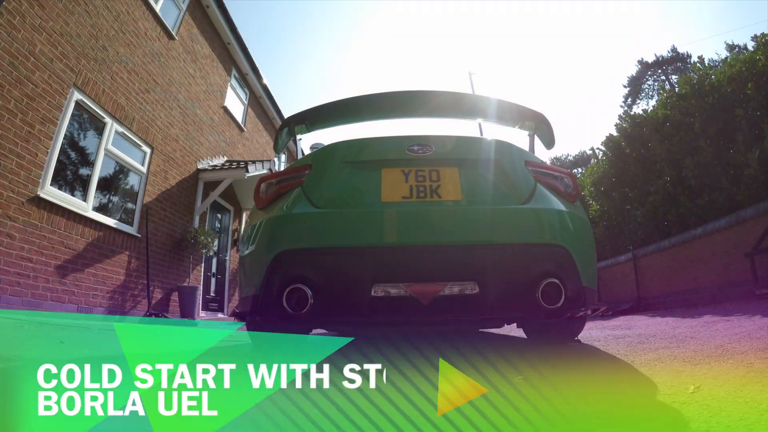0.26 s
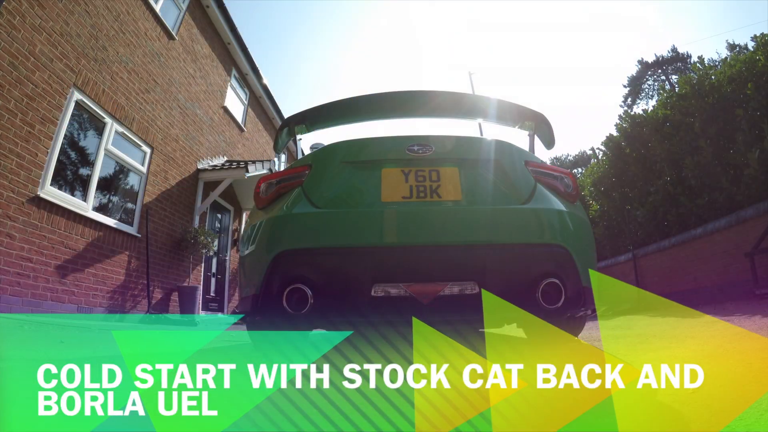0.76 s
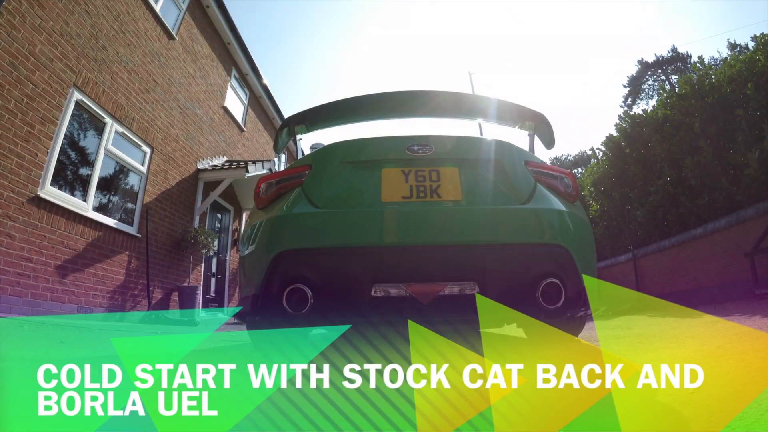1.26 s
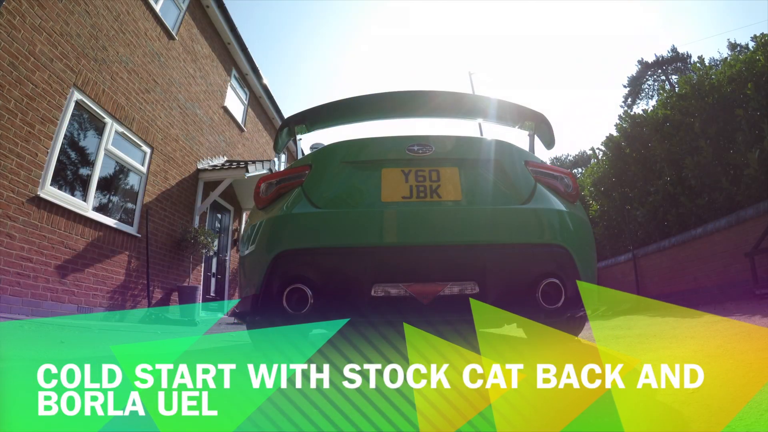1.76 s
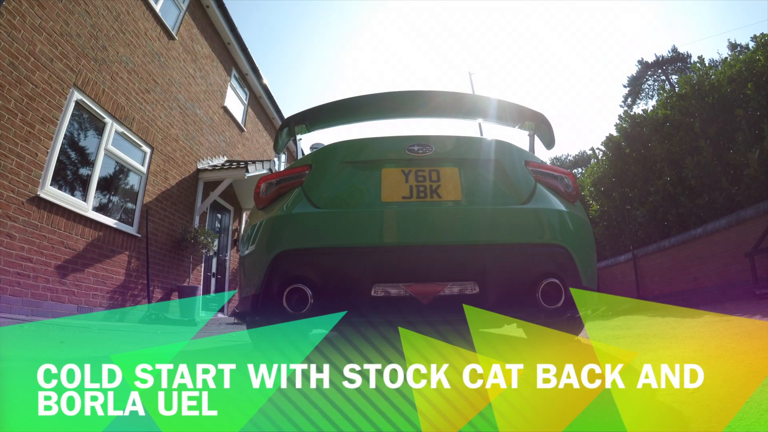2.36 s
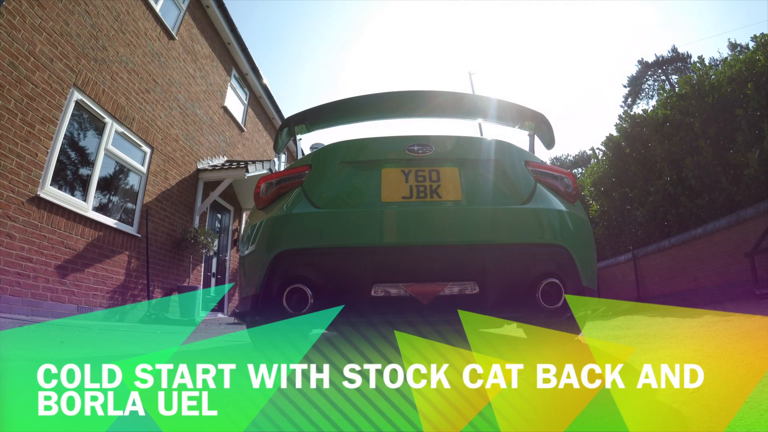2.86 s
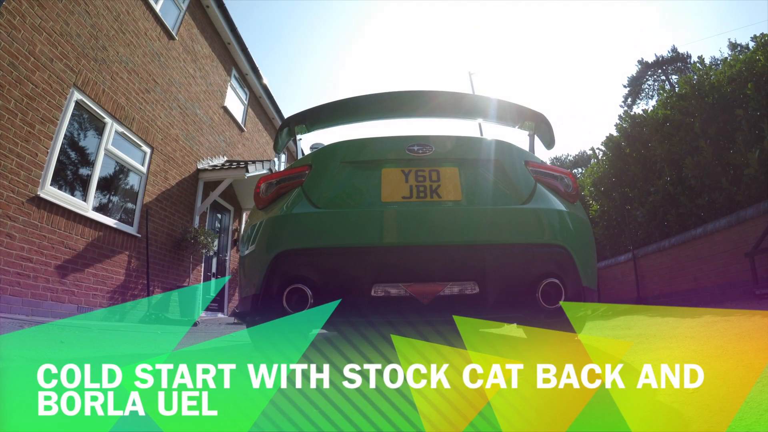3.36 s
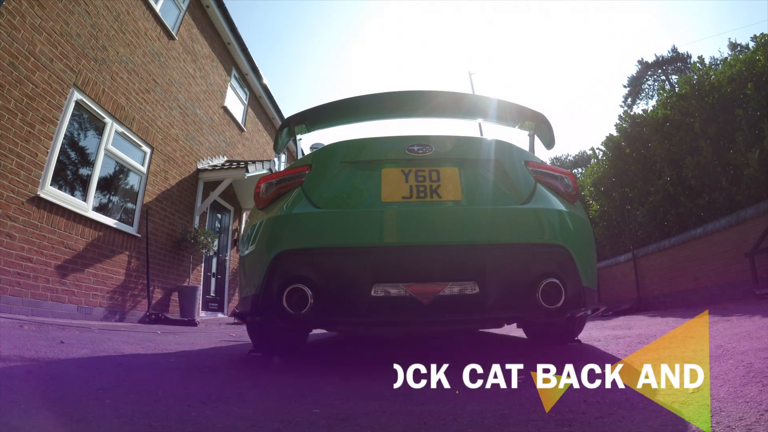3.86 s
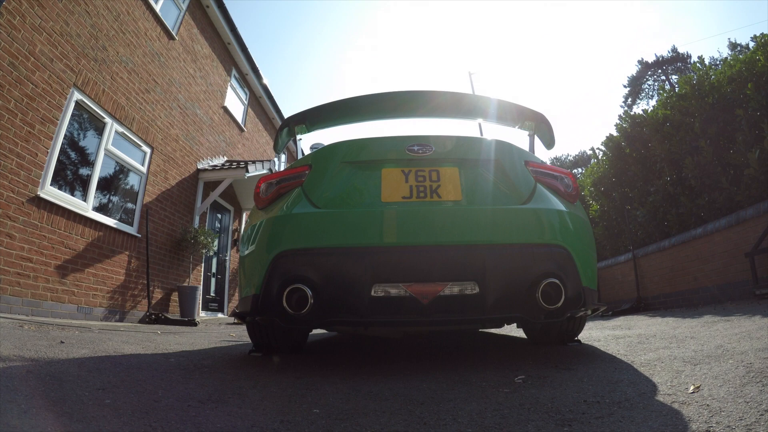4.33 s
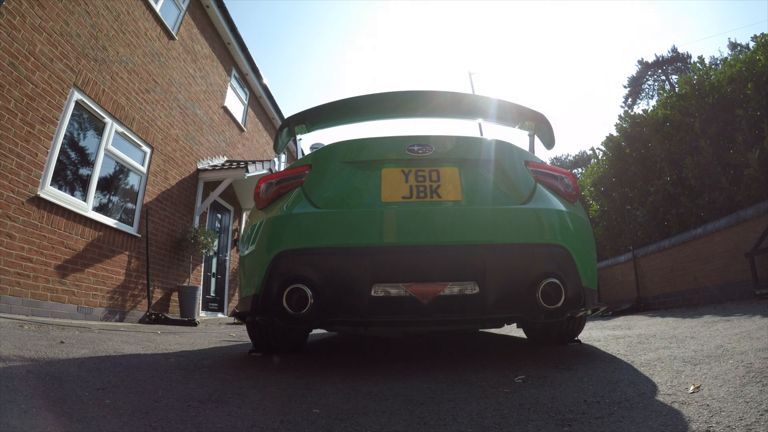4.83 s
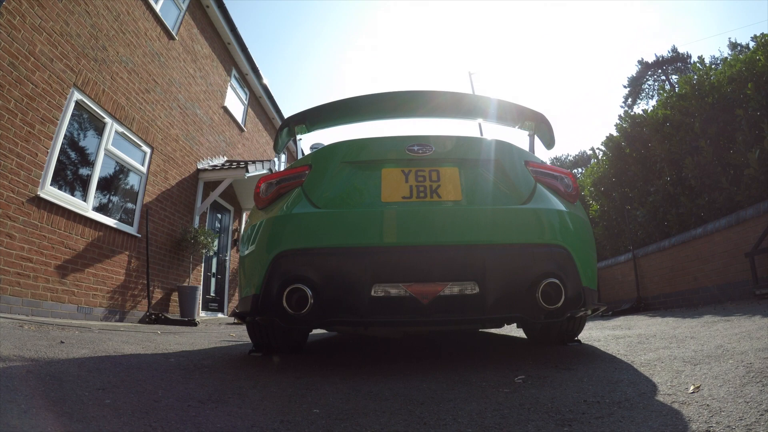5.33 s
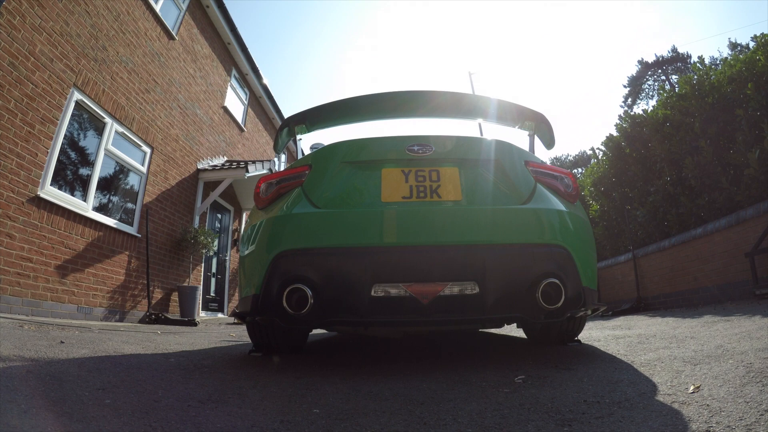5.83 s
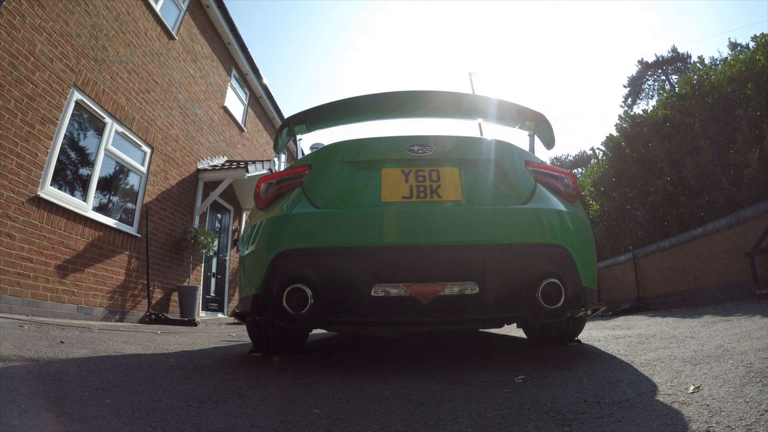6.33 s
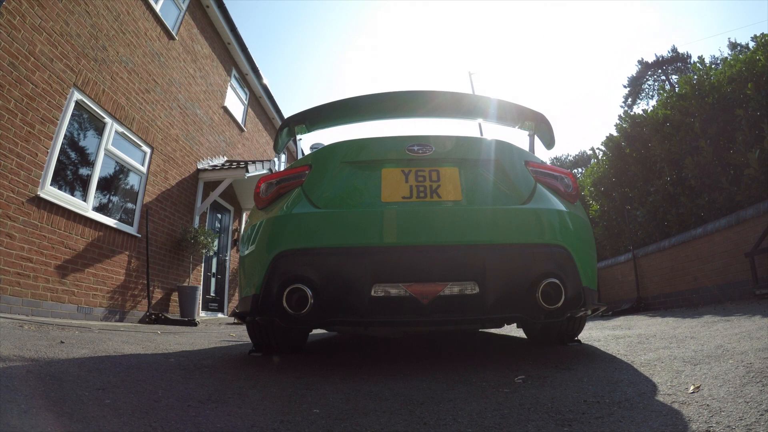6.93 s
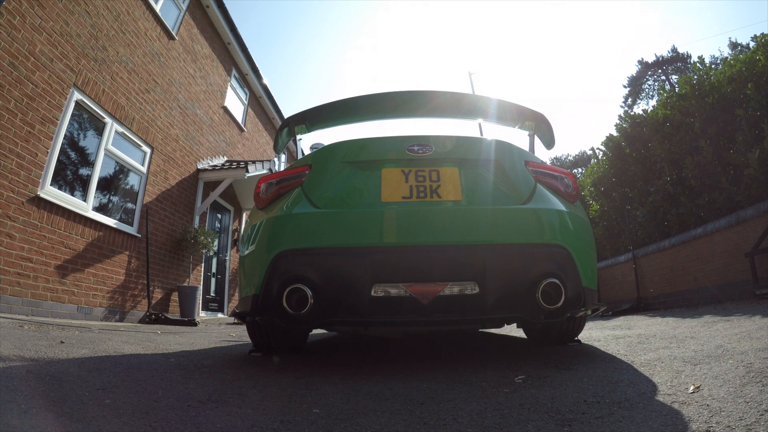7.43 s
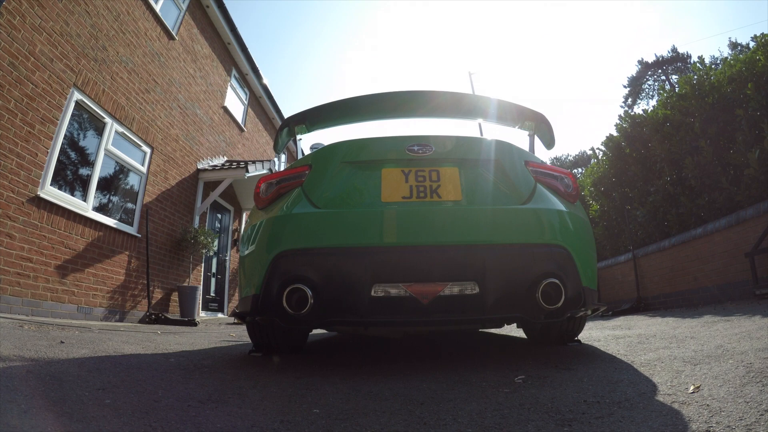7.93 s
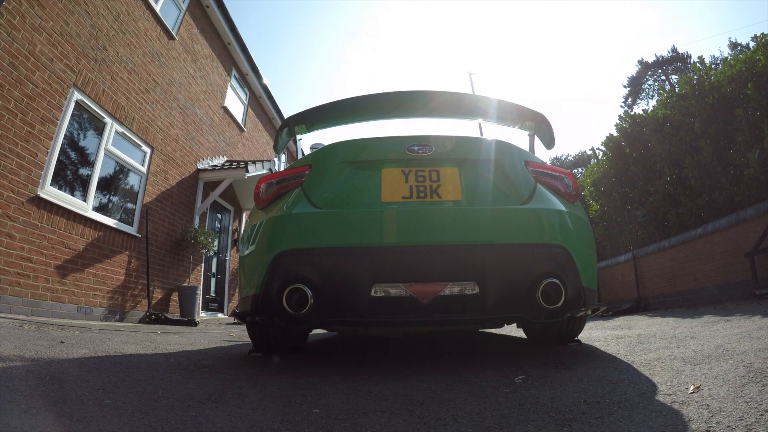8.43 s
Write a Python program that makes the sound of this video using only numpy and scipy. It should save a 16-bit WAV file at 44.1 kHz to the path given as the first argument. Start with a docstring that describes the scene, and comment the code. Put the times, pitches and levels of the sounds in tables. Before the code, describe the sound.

Close behind the tailpipes: short priming hum, knocking starter whine, ragged catch and flare, quick burbling cold idle, then two barking, crackling throttle blips.

```python
"""A flat-four sports car on a driveway, heard from just behind its tailpipes. Over distant traffic the fuel pump
hums and dies away; then the starter knocks in, grinds and whines. The engine catches in thumps, flares, and
settles to a fast cold idle with ticking from the engine bay. Then it is revved twice: pipe bark, drone, rasp and
hiss swell, and a few late burns crack. Pulses at uneven times make the burble by ringing pipe and silencer;
filtered noise makes the hiss and gusts, and a decaying noise tail makes the echo from house wall and hedge."""
import sys
import numpy as np
from scipy import signal
from scipy.fft import rfft, irfft
from scipy.io import wavfile
from scipy.ndimage import uniform_filter1d

SR = 44100
rng = np.random.default_rng(int(sys.argv[2]) if len(sys.argv) > 2 else 0)


def to_wav(sig):
    """Store sig (one row per channel, or 1-D mono) as 16-bit WAV at the path in sys.argv[1].

    Samples outside -1..1 are clipped; the rate is SR.
    """
    pcm = np.clip(np.atleast_2d(sig), -1, 1) * 32767
    pcm = np.round(pcm).astype(np.int16)
    wavfile.write(sys.argv[1], SR, pcm.T)  # frames by channels


N = 383229
T = np.arange(N) / SR  # time of every sample, s

# speed as the engine catches, flares, sags and settles to idle: t/s, firings per second f/Hz
START_SPEED = [(2.1, 13.15), (2.22, 31.66), (2.45, 58.72), (2.6, 63.59), (2.85, 54.33), (3.3, 45.44),
               (3.5, 45.31), (3.85, 50.35), (4.6, 50.97), (6.0, 50.78)]
# blips of the throttle: opens t/s, closes t/s, firings per second aimed for f/Hz
REVS = [(6.064, 6.639, 143.4), (7.811, 8.332, 159.7)]
# cylinders in firing order, with unequal headers: delay at idle t/s, strength level/dB
CYLINDERS = [(-.00052, -3.5), (-.0007, -0.3), (.0007, 0.9), (.00055, 0.7)]
# firings that burn harder than the rest: t/s, extra level/dB
HARD_FIRINGS = [(2.365, 1), (2.387, -0.5), (2.654, 8), (2.737, 4.5), (2.84, 4.5), (2.915, 3), (2.991, 5),
                (3.194, 3), (6.076, 1.5), (6.142, 2.5), (6.737, 14), (7.222, 11), (7.295, 13.5), (7.335, 8),
                (7.565, 7)]


def undb(db):
    """Turn decibels into a plain gain."""
    return 10 ** (np.asarray(db) / 20)


def unit(x):
    """Scale to an average strength (rms) of 1."""
    return x / np.sqrt(np.mean(x ** 2))


def steady(x, seconds=0.11):
    """Scale to a running rms of about 1, slowly enough that single pulses keep their shape."""
    size = int(seconds * SR / 2)
    power = uniform_filter1d(uniform_filter1d(x ** 2, size), size)
    return x / np.sqrt(np.abs(power) + 1e-3 * np.mean(x ** 2))


def curves(table):
    """Join the points of each table column by straight lines in time."""
    s, *columns = np.transpose(table)
    return [np.interp(T, s, c) for c in columns]


def noise():
    """White noise: all pitches equally strong."""
    return rng.standard_normal(N)


def waver(rate):
    """A random wander with an rms of 1; rate is how many new values come per second."""
    size = int(SR / rate)
    steps = np.repeat(rng.standard_normal(N // size + 1), size)
    return unit(uniform_filter1d(steps, size)[:N])


def smooth(x, seconds):
    """Running mean."""
    return uniform_filter1d(x * 1., max(int(seconds * SR), 1), mode="nearest")


def swell(s, length):
    """A bell-shaped rise and fall around a moment."""
    return np.exp(-2 * ((T - s) / length) ** 2)


def cut(x, hz, kind, order=2):
    """Keep only what lies below ("low") or above ("high") a frequency."""
    return signal.sosfilt(signal.butter(order, hz, kind, fs=SR, output="sos"), x)


def ring(x, modes):
    """A bank of resonances, each given as frequency and width in Hz and level in dB."""
    return sum(undb(db) * signal.lfilter(*signal.iirpeak(hz, hz / width, fs=SR), x) for hz, width, db in modes)


def colour(x, points, size=4096):
    """Shape a sound to a spectrum, with a filter that answers without ringing ahead of its input."""
    hz, db = np.transpose(points)
    grid = np.maximum(np.arange(size // 2 + 1) * SR / size, 1)
    cepstrum = irfft(np.log(undb(np.interp(np.log(grid), np.log(hz), db))))
    # folding the cepstrum forward in time makes the filter minimum-phase
    cepstrum[1:size // 2] *= 2
    cepstrum[size // 2 + 1:] = 0
    return signal.fftconvolve(x, irfft(np.exp(rfft(cepstrum))))[:N]


def clicks(times, sizes):
    """One single-sample impulse per event."""
    return np.bincount(np.clip(times * SR, 0, N).astype(int), sizes, N + 1)[:N]


def fade(x, seconds):
    """Give each impulse an exponential tail."""
    return signal.lfilter([1], [1, -np.exp(-1 / (seconds * SR))], x)


def yard(hum_hz=62):
    """Distant traffic as shaped noise, a far-off wavering hum, and the pump's hum and hiss before the start."""
    # colour of the traffic: f/Hz, level/dB
    yard_colour = [(18, -60), (30, -9), (70, -13.5), (172, -8.5), (254, -7), (311, -11), (991, -12),
                   (1160, -14.5), (1310, -16), (1740, -20), (2140, -22.5), (2500, -28.5), (14000, -51.5)]
    # colour of the pump's hiss: f/Hz, level/dB
    pump_colour = [(1470, -51), (2500, 0), (2690, -7), (3730, -15), (5250, -13), (5870, -7), (6740, -16),
                   (9230, -20), (12000, -45), (15600, -60), (22000, -120)]
    # fuel pump priming, dying away: t/s, relative level/dB
    pump_level = [(0, 4.5), (.35, 2.5), (.7, -2), (1.15, -7), (1.45, -40)]
    # pitch of the far-off hum: t/s, f/Hz
    far_hum = [(.55, 300), (.8, 265), (1.05, 225), (1.22, 242), (1.33, 297), (1.55, 325), (2.1, 322)]

    pump_db, = curves(pump_level)
    far_hz, = curves(far_hum)
    traffic_db = -42 + 3 * np.exp(-T / 0.37) + .5 * waver(8.8)  # starts a little louder and eases
    traffic = unit(colour(noise(), yard_colour)) * undb(traffic_db)
    heard = smooth((T > far_hum[0][0]) & (T < far_hum[-1][0]), .15)
    far = heard * undb(-49 + 2 * waver(26)) * np.sin(2 * np.pi * np.cumsum(far_hz) / SR)
    phase = 2 * np.pi * np.cumsum(hum_hz * (1 + 0.027 * waver(11.0))) / SR
    hum = undb(-48) * np.sin(phase) + undb(-54) * np.sin(2 * phase)
    pump_hiss = undb(-59.0) * unit(colour(noise(), pump_colour))
    return traffic + far + (hum + pump_hiss) * undb(pump_db)


def starter_effort(attack_s=.008, release_s=0.024, spin_db=-41.5, crank_db=-47.5):
    """The starter spins up, strains louder at each compression, and fades as the engine takes over."""
    # labouring against compressions: start t/s, length t/s, level/dB
    compressions = [(1.359, .05, -41), (1.658, .07, -40), (1.844, 0.057, -35.5), (2.022, 0.073, -36),
                    (2.137, 0.17, -38.5)]
    strain = 0
    for s, length, db in compressions:
        rise = np.clip((T - s) / attack_s, 0, 1)
        release = np.exp(-np.maximum(T - s - length, 0) / release_s)
        strain = strain + undb(db) * rise * release
    # spinning freely, then turning between compressions
    running = undb(np.interp(T, [1.72, 1.82], [spin_db, crank_db]))
    running = running * np.interp(T, [1.362, 1.372, 2.15, 2.34], [0, 1, 1, 0])
    return np.hypot(strain, running)


def starter(pinion_hz=8000):
    """The pinion knocks in and sings; gears grind as ringing noise and whine at multiples of a gliding pitch."""
    # base pitch of the gear mesh: t/s, f/Hz
    mesh = [(1.37, 694), (1.49, 850), (1.54, 1085), (1.6, 1250), (1.67, 1290), (1.74, 1090), (1.8, 1250),
            (2.3, 1395)]
    # pinion and compression knocks: t/s, relative level/dB
    knock_hits = [(1.37, -18.5), (1.401, -30), (1.852, -35), (2.021, -26)]
    # colour of the grinding: f/Hz, level/dB
    starter_colour = [(100, -7.5), (230, 1), (420, -7), (700, -10), (1100, -5.5), (1700, 0), (2600, -10.5),
                      (3600, -12.5), (8000, -19), (9600, -30), (15000, -40)]
    # resonances of the starter housing: f/Hz, width f/Hz, level/dB
    housing = [(613, 58, 5), (817, 92, 5), (1550, 51, -4), (2080, 92, 1), (2480, 40, -1)]

    mesh_hz, = curves(mesh)
    phase = 2 * np.pi * np.cumsum(mesh_hz * (1 + .006 * waver(700))) / SR
    # multiple of the base pitch, relative level in dB
    partials = ((2, -13), (3, -16), (4, -17), (5, -9), (6, -9), (7, -16), (8, -24), (10, -25))
    whine = sum(undb(db + 2 * waver(56)) * np.sin(k * phase) for k, db in partials)
    whine *= np.interp(T, [1.4, 1.5, 1.8, 1.95], [.4, 0.61, 0.47, 0.26])
    teeth = noise() * undb(1.0 * waver(250))
    grind = unit(unit(colour(teeth, starter_colour)) + 0.51 * unit(ring(teeth, housing)))
    pinion = unit(ring(noise(), [(pinion_hz, 60, 0)]))
    pinion = pinion * np.interp(T, [1.38, 1.41, 1.9, 2.05], [0, 0.16, 0.1, 0.023])
    s, hit_db = np.transpose(knock_hits)
    knocks = fade(clicks(s, undb(hit_db - 12)), 0.019)
    body = unit(ring(teeth, housing[:2]))  # knocks ring the low modes of the housing
    return (0.81 * grind + .8 * body) * knocks + (grind + whine + pinion) * starter_effort()


def throttle(lead_s=0.013, slew_s=0.13, delay_s=.03):
    """Shares of idling, throttle open and coasting: the load builds late and eases before the speed peaks."""
    opened = sum(smooth((T > opens + delay_s) & (T < closes - lead_s), slew_s) for opens, closes, _ in REVS)
    idling = smooth(T < REVS[0][0] + delay_s, slew_s)
    return idling, opened, 1 - idling - opened


def gusts():
    """Exhaust gas buffets the listening point: single gusts, and a low draught that follows the throttle."""
    # single gusts: t/s, length t/s, level/dB
    gust_hits = [(1.67, .07, -38), (1.85, 0.074, -38), (2.226, .13, -21), (2.66, 0.092, -26),
                 (6.71, .1, -32), (7.245, .07, -27), (7.4, .09, -27), (7.576, 0.075, -25),
                 (7.714, 0.13, -23)]
    # buffeting between gusts when idling, throttle open, coasting: level/dB each
    draught_db = (-56, -50, -38)
    draught = sum(share * undb(db) for share, db in zip(throttle(), draught_db)) * (T > START_SPEED[0][0])
    puffs = sum(undb(db) * swell(s, length) for s, length, db in gust_hits)
    rumble = steady(cut(cut(noise(), 35, "low", order=4), 11, "high"))
    return rumble * np.hypot(draught, puffs)


def crank(coast_hz_per_s=56.3, smoothing_s=.1):
    """Firings per second: a steady climb while the throttle is open, a steady fall once it shuts."""
    points = list(START_SPEED)
    for k, (opens, closes, top_hz) in enumerate(REVS):
        s, hz = points[-1]
        fall_hz = coast_hz_per_s * (opens - s) * (k > 0)  # no fall from idle before the first blip
        points += [(opens, hz - fall_hz), (closes, top_hz)]
    s, hz = points[-1]
    hz, = curves(points + [(s + 1, hz - coast_hz_per_s)])
    return np.where(T > START_SPEED[-1][0], smooth(hz, smoothing_s), hz)


def strengths(hz, full_hz=106.1, surge_share=0.46, surge_s=0.018):
    """Base levels in dB of thump, bark, rasp and hiss from throttle and speed; hard firings make a surge."""
    # exhaust over the start, last row held as the idle: t/s, thump level/dB, bark level/dB, hiss level/dB
    start_level = [(2.13, -38, -51, -28), (2.23, -26, -30.5, -38.5), (2.31, -26.5, -40.5, -43),
                   (2.39, -22, -24.5, -51.5), (2.43, -25, -32.5, -46.5), (2.82, -29, -34, -50.5),
                   (2.85, -25, -26.5, -50), (3.42, -24.5, -35, -53), (4.03, -23.5, -28, -50.5),
                   (6.0, -24, -29, -51.5)]
    # how each layer follows the engine, before its final trim in the mix: idle trim level/dB,
    # throttle open at full_hz level/dB, slope per doubling of speed level/dB,
    # coasting at full_hz level/dB, slope per doubling of speed level/dB
    thump_law = (0, -20.5, 0, -28.5, 5.5)
    bark_law = (-4, -20, 12, -38, 18.5)
    rasp_law = (3, -25, 26, -35.5, 14.5)
    hiss_law = (-0.5, -34.5, 12.5, -44.5, 13)

    idling, opened, coasting = throttle()
    octaves = np.log2(hz / full_hz)

    def law(start_db, layer):
        """Blend the three throttle states; an open throttle gains nothing more above full_hz."""
        trim_db, open_db, open_slope, coast_db, coast_slope = layer
        idle_part = idling * (start_db + trim_db)
        open_part = opened * (open_db + open_slope * np.minimum(octaves, 0))
        return idle_part + open_part + coasting * (coast_db + coast_slope * octaves)

    thump_db, bark_db, hiss_db = curves(start_level)
    s, extra_db = np.transpose(HARD_FIRINGS)
    # around hard firings thump and bark swell by a share of the extra strength
    surge_db = surge_share * smooth(fade(clicks(s - .004, extra_db), surge_s), 0.0027)
    thump_db = law(thump_db, thump_law) + surge_db
    bark_db = law(bark_db, bark_law) + surge_db
    return thump_db, bark_db, law(hiss_db, rasp_law), law(hiss_db, hiss_law)


def firings(fired, revving, idle_scatter_db=1.0, rev_scatter_db=1.5, ragged_db=1.0, jitter_s=.00007):
    """Times and strengths of the exhaust pulses; ragged while the engine catches and on the overrun."""
    count = np.arange(1, int(fired[-1]) + 1)
    times = np.interp(count, fired, T)
    delay, db = np.array(CYLINDERS)[count % 4].T
    chance = rng.standard_normal((len(count), 2)).T
    fast = np.interp(times, T, revving)
    ragged = (times < 2.8) | ((times > 6.9) & (times < 7.8))
    db = db + (idle_scatter_db + rev_scatter_db * fast + ragged_db * ragged) * chance[0]
    for s, extra_db in HARD_FIRINGS:
        nearest = np.argmin(np.abs(times + .002 - s))
        db[nearest] += extra_db
    jitter = jitter_s * (1 + 3 * ragged) * chance[1]
    return times + delay * (1 - 0.28 * fast) + jitter, undb(db)


def thump(pulses, puff_s=0.0074):
    """Each firing leaves as a rounded puff that rings the silencer."""
    # silencer resonances: f/Hz, width f/Hz, level/dB
    silencer = [(44.5, 3, 1), (106.3, 14, -3.5), (188, 58, 5.5)]
    puff = np.sin(np.pi * np.minimum(T[:1024] / puff_s, 1)) ** 2
    flow = -signal.fftconvolve(pulses, puff)[:N]
    return steady(cut(flow + 1.74 * ring(flow, silencer), 11, "high", order=1))


def disperse(x, seconds=0.002335, share=0.65):
    """An all-pass: reflections between the pipe's bends spread each pulse out without colouring it."""
    feedback = np.zeros(int(seconds * SR) + 1)
    feedback[0], feedback[-1] = 1, share
    return signal.lfilter(feedback[::-1], feedback, x)


def bark(times, sizes, gas, revving, direct=0.21, direct_low_hz=520, direct_top_hz=900):
    """Each puff's steep edge slaps out, scatters in its header and rings the pipe, brighter under load."""
    # pipe resonances: f/Hz, width f/Hz, idling level/dB, loaded level/dB
    pipe = [(325.6, 38, -3, 0.5), (478.3, 67, 5, 2.5), (577, 51, 6, 10), (703, 54, 3, 8), (823, 40, 2.5, 5),
            (948, 17, -1.5, -1), (1062, 47, -2, -11), (1260, 81, -8, -5), (1380, 44, -20, -13),
            (1505, 40, -12, -21)]
    blast = 0
    for k in range(len(CYLINDERS)):
        header = rng.standard_normal(1024) * np.exp(-T[:1024] / .005)
        edges = -clicks(times[k::len(CYLINDERS)], sizes[k::len(CYLINDERS)])
        scattered = signal.fftconvolve(edges, header / np.linalg.norm(header))[:N]
        blast = blast + edges + (.3 + .15 * revving) * scattered
    slap = cut(-clicks(times + 0.001494, sizes), direct_low_hz, "high")
    slap = direct * steady(cut(slap, direct_top_hz, "low", order=4))
    blast = cut(steady(disperse(blast)) + 0.36 * gas, 188, "high")
    idle = cut(ring(blast, [(hz, width, db) for hz, width, db, _ in pipe]), 705, "low", order=4)
    loaded = cut(ring(blast, [(hz, width, db) for hz, width, _, db in pipe]), 1130, "low", order=4)
    rung = (1 - revving) * steady(idle) + revving * steady(loaded)
    return steady(rung + slap * (1 - 0.5 * revving))


def engine_bay(fired, tick_scatter_db=4.0):
    """Valves and injectors tick twice per firing over the rush of belts and fan."""
    # colour of the clatter: f/Hz, level/dB
    bay_colour = [(1760, -38), (3000, -0.5), (3320, -0.5), (3600, -1.5), (4290, 0), (4430, -3),
                  (4770, -1.5), (5690, -5), (7010, -9), (8690, -5), (9550, -12.5), (14300, -19.5),
                  (15000, -20)]
    # injector rings: f/Hz, width f/Hz, level/dB
    injectors = [(3060, 22, -8), (3700, 60, 9), (4150, 54, -1), (4720, 35, 24.5), (8500, 180, -6)]
    times = np.interp(np.arange(1, 2 * fired[-1]) / 2, fired, T)
    sizes = undb(tick_scatter_db * rng.standard_normal(len(times)))
    ticks = fade(clicks(times, sizes), 0.0045)
    clatter = .5 * steady(ticks * noise()) + noise()
    return steady(unit(colour(clatter, bay_colour)) + undb(-15.0) * unit(ring(clatter, injectors)))


def drone(fired, hz, revving, waver_db=0.5):
    """Tones locked to the firing cycle swell as they sweep through the silencer's resonances."""
    # droning tones: multiple of the four-firing cycle, resonance f/Hz, half width f/Hz,
    # throttle open level/dB, coasting level/dB
    drone_orders = [(3, 105.3, 23, -49.5, -25), (4, 120.5, 31, -10.5, -30.5), (4, 153, 7.2, -18, -21.5),
                    (6, 215.5, 36.4, -35, -22), (8, 184.6, 26, -16.5, -40.5)]
    _, opened, _ = throttle(0.075)  # the drone eases earlier than the other layers
    out = 0
    for k, centre_hz, width_hz, open_db, coast_db in drone_orders:
        resonance = np.exp(-((k * hz / 4 - centre_hz) / width_hz) ** 2)
        db = coast_db + opened * (open_db - coast_db) + waver_db * waver(30)
        out = out + resonance * undb(db) * np.cos(np.pi / 2 * k * (fired - .2))
    return -np.sqrt(2) * out * revving


def engine(edge_s=.0003, gas_s=0.01):
    """Firings drive thump, pipe bark and rasp; the engine bay ticks at idle, gas hisses at speed."""
    # colour of the rasp: f/Hz, level/dB
    rasp_colour = [(560, -28.5), (950, -3.5), (1000, -8), (1400, -1), (1620, -3), (2490, -7.5), (3070, -17),
                   (3310, -21), (3800, -15.5), (4940, -30), (8360, -120)]
    # colour of the hissing gas: f/Hz, level/dB
    flow_colour = [(1760, -21.5), (3000, -2.5), (3620, -6.5), (4550, -4.5), (4970, -7.5), (6170, -7.5),
                   (7810, -11.5), (8810, -9), (10200, -17), (13900, -20.5), (15000, -25)]

    hz = crank()
    firing = T > START_SPEED[0][0]
    fired = .6 + np.cumsum(hz * firing) / SR  # running count of firings
    revving = np.clip((hz - 60) / 22, 0, 1)  # 0 at idle, 1 at speed
    thump_db, bark_db, rasp_db, hiss_db = strengths(hz)
    times, sizes = firings(fired, revving)
    edge_times = times + edge_s  # the steep edge of each puff
    edges = clicks(edge_times, sizes)
    gas = steady(fade(edges, gas_s) * noise())  # turbulence behind each edge

    low = thump(clicks(times, sizes)) * undb(thump_db - 5.7 * revving) + drone(fired, hz, revving)
    burble = steady(cut(cut(gas, 356, "low", order=4), 105, "high"))
    burble = burble * undb(thump_db - 11.0 + 8.8 * revving)
    pipe_bark = bark(edge_times, sizes, gas, revving) * undb(bark_db + 3.5)
    crackle = steady(colour(edges, rasp_colour)) * (0.018 + 0.15 * revving)
    rough = steady(colour(0.34 * gas + 1.04 * noise(), rasp_colour))
    rasp = steady(crackle + rough) * undb(rasp_db - 3.5 * revving)
    flow = steady(colour(noise() + 0.75 * gas, flow_colour))
    hiss = np.sqrt(1 - revving) * engine_bay(fired) + np.sqrt(revving) * flow
    caught = np.clip((T - 2.15) / 0.18, 0, 1)  # fades in as the engine catches
    return low + burble + (pipe_bark + rasp + hiss * undb(hiss_db + 0.9)) * caught


def air(bright_hz=2500, gasp_hz=5600, gasp_width_hz=1100, gasp_after_s=0.13, gasp_s=0.15):
    """Bright noise bursts hiss now and then; air rushing past the opening throttle gasps at each blip."""
    # hiss as the engine catches, on the overrun and at top speed: t/s, length t/s, level/dB
    hiss_bursts = [(2.27, .08, -49), (2.583, 0.024, -43), (2.67, 0.012, -36), (7.17, 0.12, -35.5),
                   (8.24, 0.079, -30)]
    gasps = sum(swell(opens + gasp_after_s, gasp_s) for opens, _, _ in REVS)
    bursts = sum(undb(db) * swell(s, length) for s, length, db in hiss_bursts)
    intake = unit(ring(noise(), [(gasp_hz, gasp_width_hz, 0)])) * undb(-46) * gasps
    grains = noise() * undb(2.5 * waver(400))
    bright = unit(cut(cut(grains, bright_hz, "low", order=1), 1200, "high"))
    return intake + bright * bursts


def cracks(decay_s=.012):
    """Now and then a charge burns late and cracks in the pipe: a dying burst of noise."""
    # late burns: t/s, relative level/dB
    late_burns = [(2.6534, -32), (3.237, -27), (6.32, -11.5), (6.3626, -13.5), (6.737, -29), (7.222, -29),
                  (7.293, -35), (7.926, -14), (7.969, -16)]
    s, db = np.transpose(late_burns)
    burst = fade(clicks(s, undb(db + 4)), decay_s) * noise()
    return cut(cut(burst, 2600, "low", order=4), 600, "high", order=1)


def scene():
    """The car with its scattered echo from house wall and hedge, plus gusts and yard."""
    car = engine() + air() + cracks() + starter()
    tail = noise() * np.exp(-T / 0.056) * (T > .012)  # the echo starts 12 ms late and dies away
    tail = tail[:SR // 2] / np.sqrt(np.sum(tail ** 2))
    echo = signal.fftconvolve(cut(car, 272, "high"), tail)[:N]
    return (car + undb(-6.5) * echo + gusts() + yard())[None]


def record(dry, top_hz=15300):
    """Round off the loudest peaks and cut everything above the top frequency."""
    rounded = np.tanh(0.72 * dry) / 0.77
    return signal.sosfilt(signal.ellip(10, .2, 80, top_hz, fs=SR, output="sos"), rounded)


dry = scene()
out = record(dry)
to_wav(out)
```